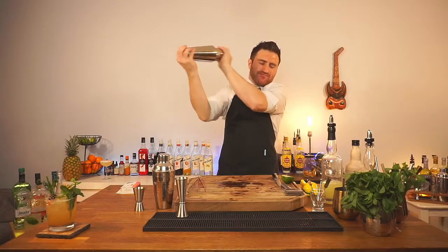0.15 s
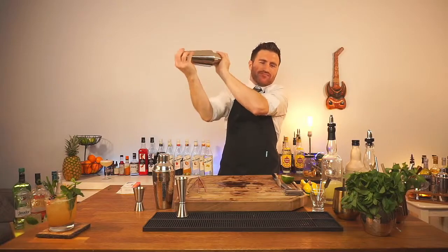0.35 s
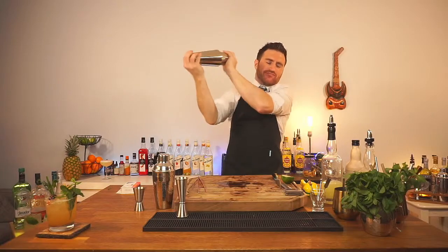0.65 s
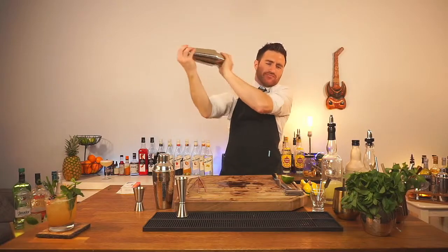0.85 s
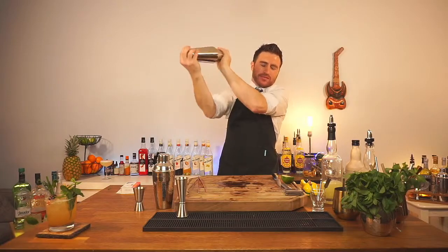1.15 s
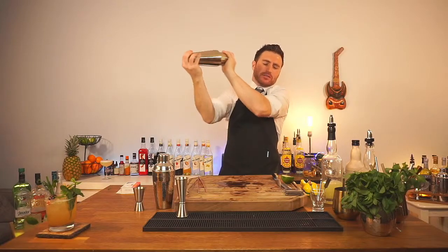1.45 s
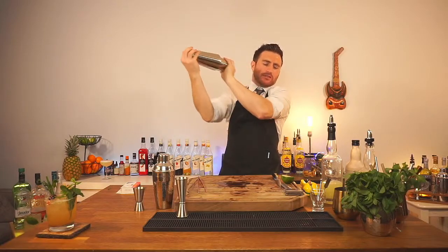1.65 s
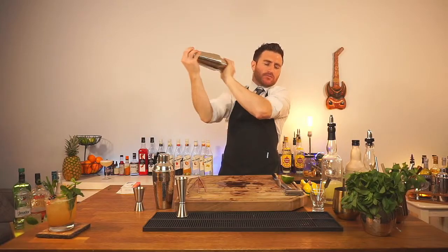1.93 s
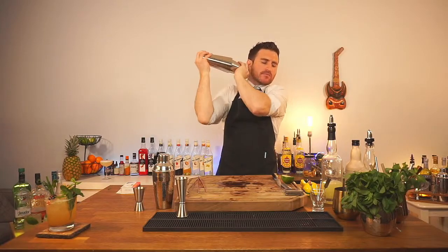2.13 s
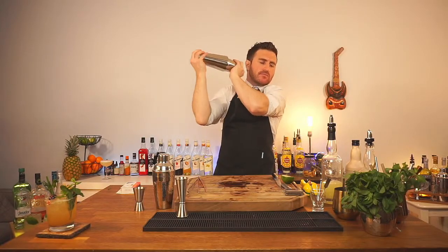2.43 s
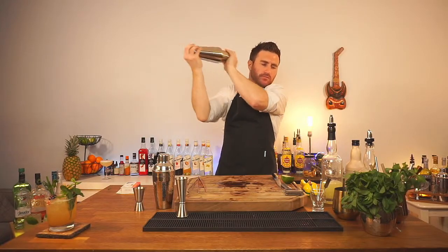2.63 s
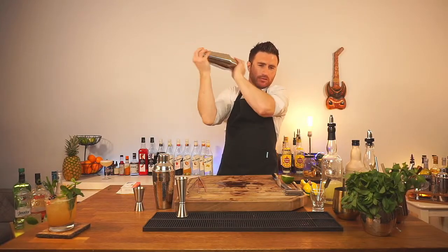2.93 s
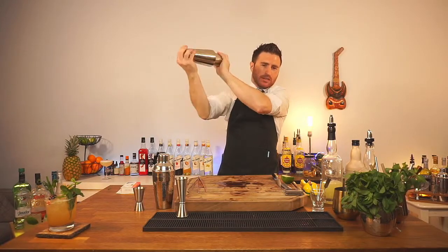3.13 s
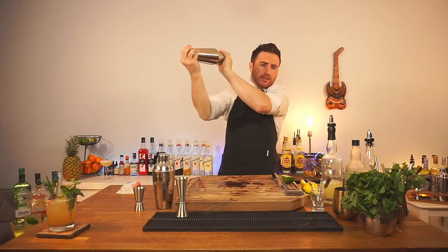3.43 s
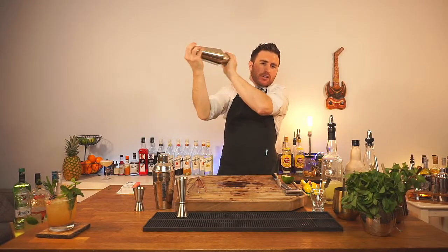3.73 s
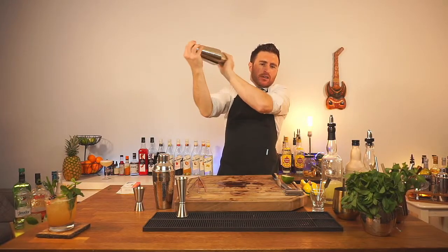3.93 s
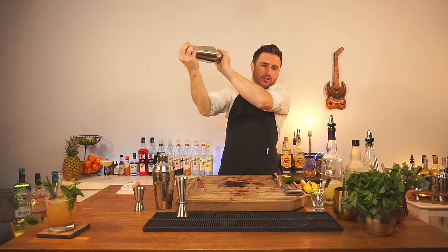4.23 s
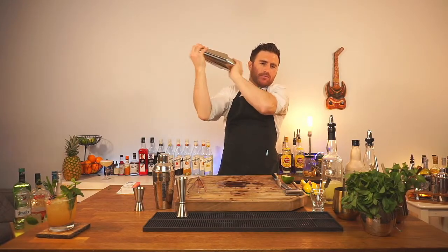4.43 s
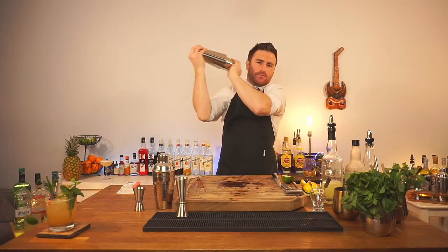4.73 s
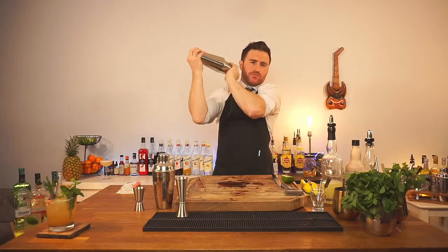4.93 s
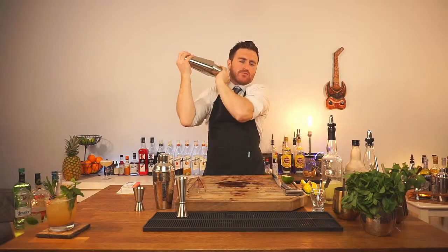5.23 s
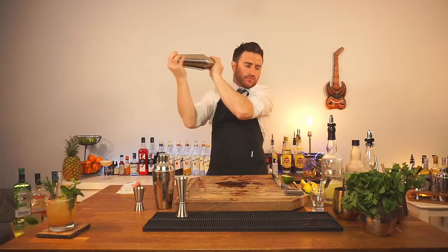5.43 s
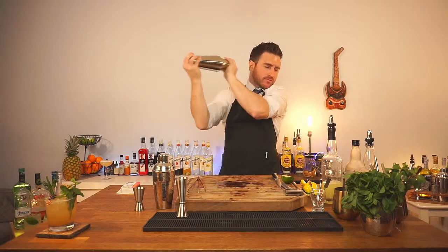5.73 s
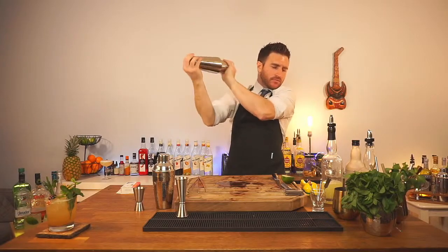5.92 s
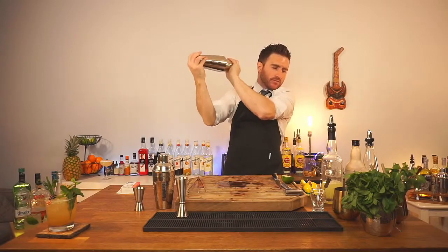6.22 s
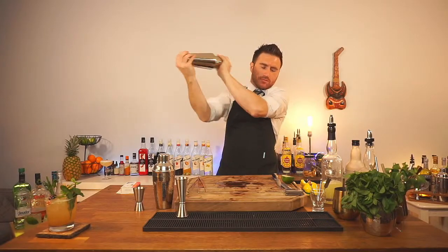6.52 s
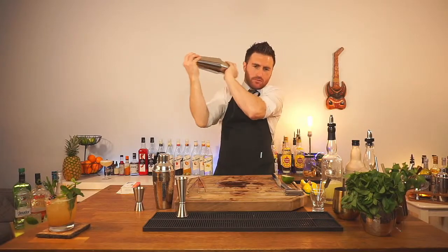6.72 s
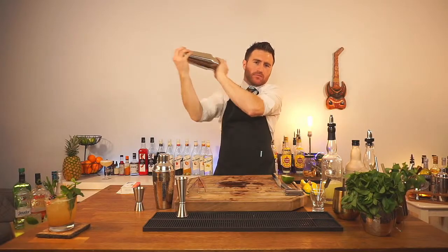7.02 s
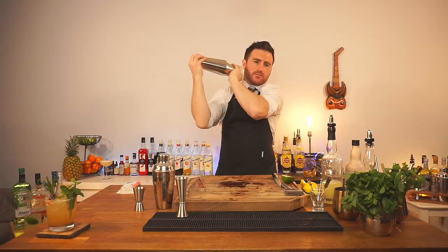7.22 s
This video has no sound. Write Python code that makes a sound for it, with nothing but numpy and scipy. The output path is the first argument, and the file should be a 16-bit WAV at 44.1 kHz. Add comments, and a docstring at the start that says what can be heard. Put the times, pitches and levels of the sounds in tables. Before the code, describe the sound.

From the very start, ice and liquid are shaken hard in a metal tin, close to a body-worn microphone in a small room. Roughly every 0.27 seconds a burst of hard, bright, quickly damped clacks strikes the steel base; about 0.15 seconds later the ice returns to the cap with a dull knock and softer patter. Liquid fizzes and swishes with both. The first second is full and vigorous; from about 1.3 to 2.8 seconds the returns grow weaker and the rhythm slightly looser, then strong strokes resume near 3.0. Around 4.5 to 4.6 seconds a low, blustery thump with sharp pops buffets the microphone, with a smaller flutter near 5.4. Shaking continues evenly, with an especially hard ringing clack at 7.0, and still runs as the sound ends around 7.4 seconds. Low rumble is faint, reverberation short.

```python
"""Hard, ringing clacks of ice on steel: cubes and a drink are shaken in a tin beside a clip-on microphone.
Each stroke throws the ice at the base, and the return makes a softer rattle at the cap; both are showers of
blows on short, damped resonances. The drink is coloured noise that fizzes with every stroke in a small room.
Jolts of the body sway the microphone, gusts and pops of air buffet it, and the loudest peaks saturate."""
import sys
import numpy as np
from scipy import signal
from scipy.fft import rfft, irfft, next_fast_len
from scipy.io import wavfile
from scipy.ndimage import uniform_filter1d, map_coordinates

SR = 44100
rng = np.random.default_rng(int(sys.argv[2]) if len(sys.argv) > 2 else 0)


def store_pcm(level_fs):
    """Save levels as 16-bit WAV."""
    pcm = np.round(np.clip(level_fs, -1, 1) * 32767).astype(np.int16)
    wavfile.write(sys.argv[1], SR, np.atleast_2d(pcm).T)


N = 325011

# Hand-damped modes of the tin's two ends, thud first: middle pitch_hz, relative level_db,
# decay_s (60 dB fall of each of the two cascaded resonators that make a mode)
BASE_MODES = [(1087, -2, 0.0029), (1544, -3.5, 0.0032), (2298, 2, 0.0033), (2803, 1.5, 0.0053),
              (4090, -12.5, 0.0054), (5150, 1, 0.0016), (5924, -1, 0.0032), (7360, -3, 0.0012),
              (8930, -6, 0.0024), (11400, -6, 0.0011)]
CAP_MODES = [(920, 14.6, 0.0014), (1510, 12.4, 0.0013), (2638, 2.9, 0.014), (3870, 9.6, 0.0031),
             (4850, 13, 0.003), (6280, 15, 0.0013), (9600, 11, 0.0011)]


def amp(db):
    """Decibels to linear gain."""
    return 10 ** (np.asarray(db) / 20)


def unit(x):
    """Scale to rms 1."""
    return x / np.sqrt(np.mean(x ** 2) + 1e-20)


def filtered(x, response):
    """Multiply the spectrum of x by a response given as a function of frequency in Hz."""
    size = next_fast_len(N + SR // 2)
    spectrum = rfft(x, size) * response(np.fft.rfftfreq(size, 1 / SR))
    return irfft(spectrum, size)[..., :N]


def noise(spectrum):
    """Noise of rms 1, coloured by points of (Hz, relative dB) joined on a log-frequency scale."""
    point_hz, point_db = np.transpose(spectrum)

    def colour(hz):
        return amp(np.interp(np.log(hz + 1), np.log(point_hz + 1), point_db))

    return unit(filtered(rng.standard_normal(N), colour))


def wobble(rate_hz):
    """A smooth random curve with rate_hz knots a second."""
    knots = rng.standard_normal(int(N * rate_hz / SR) + 4)
    return map_coordinates(knots, [np.arange(N) * rate_hz / SR])


def strokes():
    """The shaking motion: rows of (start_s, level_db, press_s) for the base and for the cap."""
    # Each shake, out and back: base_start_s, base_level_db, base_press_s, cap_start_s, cap_level_db
    # (levels are relative: each layer adds its own gain)
    shakes = [(0.002, -28.5, 0.074, 0.15, -32), (0.265, -29, 0.058, .411, -32.5),
              (0.514, -30.5, 0.062, 0.66, -32), (0.765, -30, 0.072, .93, -33.5),
              (1.019, -33, 0.063, 1.171, -35.5), (1.312, -34, 0.06, 1.466, -43.5),
              (1.62, -40, 0.054, 1.76, -52.5), (1.856, -35, 0.084, 2.035, -39),
              (2.179, -33.5, 0.054, 2.32, -38), (2.457, -36, 0.074, 2.607, -45),
              (2.764, -33.5, 0.043, 2.875, -39.5), (3.032, -28, .036, 3.181, -39),
              (3.314, -35.5, 0.067, 3.461, -36.5), (3.593, -32.5, 0.065, 3.722, -33.5),
              (3.872, -28.5, 0.036, 4.001, -39), (4.139, -29.5, 0.034, 4.282, -34),
              (4.402, -31, 0.073, 4.558, -32.5), (4.709, -30.5, 0.065, 4.884, -37.5),
              (5.008, -30, 0.042, 5.151, -33.5), (5.285, -34, 0.067, 5.43, -35),
              (5.544, -34.5, 0.1, 5.725, -33.5), (5.831, -36.5, 0.1, 6.012, -37),
              (6.121, -35, 0.097, 6.304, -35), (6.407, -35, 0.085, 6.565, -31.5),
              (6.698, -31.5, 0.081, 6.841, -32.5), (6.957, -31, 0.086, 7.116, -33),
              (7.222, -27.5, 0.074, 7.36, -48)]
    base_s, base_db, base_press_s, cap_s, cap_db = np.transpose(shakes)
    cap_press_s = np.full(len(cap_s), 0.055)
    return np.transpose([base_s, base_db, base_press_s]), np.transpose([cap_s, cap_db, cap_press_s])


def envelope(rows, rise_db, fall_db):
    """The load gathers at rise_db a second, presses for the stroke's length, then slides off at fall_db a second."""
    t, out = np.arange(N) / SR, np.zeros(N)
    for start_s, level_db, press_s in rows:
        span = slice(max(round((start_s - .1) * SR), 0), round((start_s + .5) * SR))
        since = t[span] - start_s
        fall = fall_db * np.maximum(since - press_s, 0)
        rise = rise_db * np.minimum(since, 0)
        out[span] += amp(level_db - fall + rise)
    return out


def strike(start_s, level_db, thud_db, modes, scatter_db):
    """Each blow lands elsewhere on the wet tin: every mode answers at a new strength, sign and one of three pitches."""
    shape = (len(start_s), len(modes))
    size_db = rng.normal(0, scatter_db, shape)
    pitch = rng.integers(3, size=shape)
    sign = rng.choice([-1, 1], shape)
    size_db[:, 0] += thud_db
    size_db[:, 1] += np.minimum(thud_db, 0) / 2  # a glancing blow also leaves the next mode quiet
    # a square blow loads the wall and rings lower
    pitch = np.clip(pitch - np.round(np.reshape(thud_db, (-1, 1)) / 20), 0, 2)
    gain = sign * amp(size_db + np.transpose(modes)[1])
    gain *= (amp(level_db) / np.linalg.norm(gain, axis=1))[:, None]
    at, out = np.round(start_s * SR).astype(int), np.zeros(N)
    for k, (pitch_hz, _, decay_s) in enumerate(modes):
        for step in range(3):
            near_hz = pitch_hz * (.93 + .07 * step)
            pole = amp(-60 / (decay_s * SR)) * np.exp(2j * np.pi * near_hz / SR)
            blows = np.bincount(at, gain[:, k] * (pitch[:, k] == step), N)
            # wet contact: the double pole makes the ring swell, then die
            swell = signal.lfilter([np.e * (1 - abs(pole))], [1, -2 * pole, pole ** 2], blows)
            out += swell.imag
    return out


def rattle(rows, modes, count, rise_db, fall_db, spread_db, thud_db):
    """A shower of contacts under each stroke: few large, many small; the thud follows the age of the stroke."""
    start_s, luck = rng.random((count, 2)).T
    start_s = start_s * (N - 1) / SR
    load = envelope(rows, rise_db, fall_db)[(start_s * SR).astype(int)]
    level_db = 20 * np.log10(load + 1e-9) - spread_db * np.log(1 - luck * .92)
    # contacts up to 30 ms early belong to the coming stroke
    stroke = np.maximum(np.searchsorted(rows[:, 0], start_s + .03) - 1, 0)
    age_s = start_s - rows[stroke, 0]
    return strike(start_s, level_db, thud_db(age_s), modes, scatter_db=7)


def hard_clacks():
    """The hardest cubes strike one by one, each with its own balance of thud against ring, all rung on the
    modes of the base; the one near 2.03 s is a cube knocking back at the cap."""
    # Single blows: start_s, level_db (all modes together), thud_db (shift of the first mode)
    clack_table = [(0.0123, -3, 5.5), (0.0436, -4.5, 12), (0.2682, -18, -20), (0.2813, -12, -4),
                   (0.2878, -6.5, -1), (.2994, -12, 4), (0.306, -6.5, 10), (0.5039, -10.5, -29.5),
                   (0.514, -8, -25), (.5407, -10, -3), (.76, -10, -3), (0.7636, -7, 9), (0.7765, -10, -17),
                   (1.012, -11, -37), (1.033, -12, -6), (1.041, -9, -25), (1.073, -10, 7),
                   (1.0815, -4.5, 5), (1.346, -4.5, 12.5), (1.3558, -12.5, 16), (1.62, -7.5, 3),
                   (1.626, -12, 4), (1.6489, -12, -15), (1.8613, -11.5, -27), (1.8847, -4, 6.5),
                   (1.924, -14, -15), (2.033, -16.5, 18), (2.18, -9, 8.5), (2.1911, -13, 13),
                   (2.2102, -11, 19), (2.4644, -2, 6.5), (2.508, -8, 9.5), (2.7607, -5, -1.5),
                   (3.0362, -10.5, 0), (3.06, -10, -8), (3.067, -4.5, 12.5), (3.0697, -11.5, 6),
                   (3.0787, -16, -6), (3.3355, -9.5, 10), (3.3482, -10, -2), (3.5988, -7.5, 1),
                   (3.6163, -9, -8), (3.6247, -7, -8), (3.8838, -8.5, 11), (4.137, -9.5, -12),
                   (4.142, -8, 8), (4.405, -12, -9), (4.4193, -10, -14), (4.4429, -4, -2), (4.4557, -6, -1),
                   (4.4648, -9, -2), (4.7357, -10, -29), (4.7441, -2, -2), (4.759, -8, -10),
                   (5.0095, -11.5, -35), (5.2935, -10.5, 1), (5.31, -14, -4), (5.3185, -11, 8),
                   (5.3293, -13, 0), (5.55, -9.5, -8), (5.5676, -11.5, 1), (5.5906, -5.5, -8),
                   (5.6107, -7.5, 13), (5.6218, -10, 3), (5.818, -14.5, -8), (5.834, -12, 1),
                   (5.863, -5, 17), (6.1217, -8.5, -25), (6.1278, -7, -1), (6.1354, -9, 9),
                   (6.1575, -6, -8), (6.188, -10.5, -14), (6.419, -11, -31), (6.437, -5.5, 9.5),
                   (6.446, -6.5, 1), (6.479, -7, 14), (6.4903, -13.5, 3), (6.7003, -5.5, -23),
                   (6.7163, -5.5, 12.5), (6.7371, -7.5, 13), (6.9639, -2, -29.5), (6.996, 2, -24),
                   (7.006, -7.5, 10), (7.2188, -12, -4), (7.2277, -7, -17), (7.2367, -8.5, -23),
                   (7.2767, -9.5, 10), (7.282, -8, -14), (7.2982, -9, 14)]
    return strike(*np.transpose(clack_table), BASE_MODES, scatter_db=3)


def base_rattle(rows):
    """Small contacts on the base start bright and dull as the load piles up."""
    first_thud_db, thud_db_per_s, last_thud_db = -16, 396, 5

    def piling(age_s):
        return np.minimum(first_thud_db + thud_db_per_s * age_s, last_thud_db)

    return rattle(rows, BASE_MODES, count=1900, rise_db=2200, fall_db=423, spread_db=7.0, thud_db=piling)


def cap_rattle(rows):
    """The returning ice patters softly on the cap, with an even balance of thud and ring."""
    return rattle(rows, CAP_MODES, count=2000, rise_db=1500, fall_db=288, spread_db=4.5, thud_db=np.zeros_like)


def cap_knocks(rows):
    """One cube leads each return with a dull knock that favours the first mode of the cap."""
    return strike(rows[:, 0], rows[:, 1] + 13.5, 25, CAP_MODES, scatter_db=4)


def cap_ticks():
    """Lone bright ticks ring only three of the cap's upper modes."""
    # Single ticks: start_s, level_db (all modes together)
    tick_table = [(0.4557, -13), (5.5239, -15.5), (6.0366, -12.5), (6.3282, -13), (7.1659, -19)]
    return strike(*np.transpose(tick_table), -4, CAP_MODES[3:6], scatter_db=3)


def ice():
    """Clacks, rattles, knocks and ticks sound through a small tin, which radiates little bass."""
    to_base, to_cap = strokes()
    rattles = amp(4.0) * base_rattle(to_base) + amp(4.0) * cap_rattle(to_cap)
    tin = hard_clacks() + cap_ticks() + rattles + cap_knocks(to_cap)
    return filtered(tin, lambda hz: (1j * hz / (300 + 1j * hz)) ** 3)


def drink():
    """The liquid fizzes along the wall in shifting patches with every stroke, strongest around its hollow note."""
    # Basic colour of the fizz: pitch_hz, relative level_db (per Hz)
    slosh = [(300, -22.5), (450, -7), (1000, -16), (3300, -11.5), (4200, -13), (6000, -11), (10000, -19),
             (16000, -30)]
    # Hollow note as the drink washes past the ice: time_s, pitch_hz
    wash = [(0, 3770), (5.3, 4440)]
    hz, t, spectra = signal.stft(noise(slosh), SR, nperseg=128)
    patches = uniform_filter1d(rng.standard_normal(spectra.shape), size=2, axis=0)
    patches = uniform_filter1d(patches, size=15, axis=1)
    hollow_hz = np.interp(t, *np.transpose(wash))
    hollow = np.exp(-((hz[:, None] - hollow_hz) / 450) ** 2)
    shaped = spectra * amp(4.5 * unit(patches) + 8 * hollow)
    fizz = unit(signal.istft(shaped, nperseg=128)[1][:N])
    surge = envelope(np.vstack(strokes()), rise_db=1403, fall_db=239)
    return (amp(-3.5) * surge + amp(-66)) * fizz  # a very faint fizz never stops


def room(x):
    """A short, dull answer from the walls: decaying noise that starts after 3 ms, softened above 3500 Hz."""
    t, decay_s = np.arange(SR // 4) / SR, .15
    tail = rng.standard_normal(len(t)) * amp(-60 * t / decay_s) * (t > .003)
    wet = signal.fftconvolve(x, tail / np.linalg.norm(tail))[:N]
    return filtered(wet, lambda hz: 1 / (1 + 1j * hz / 3500))


def sway():
    """Each reversal jolts the chest: a push mostly below hearing, with a rebound after the strokes to the base."""
    lead_s = .06  # room for the start of each push ahead of its stroke
    t, jolts = np.arange(SR // 5) / SR - lead_s, np.zeros((2, N + SR))
    for end, rows in enumerate(strokes()):
        jolts[end, (rows[:, 0] * SR).astype(int)] = amp(rng.normal(-27.5, 3.0, len(rows)))

    def bump(centre_s, width_s):
        return np.exp(-((t - centre_s) / width_s) ** 2)

    base_push = 0.5 * bump(0.012, 0.017) - 0.66 * bump(0.065, 0.019)
    cap_push = 1.15 * bump(0.02, 0.022)
    pushes = signal.fftconvolve(jolts, [base_push, cap_push], axes=1).sum(0)
    return pushes[round(lead_s * SR):][:N]


def buffet():
    """Lumpy turbulence and a few sharp pops on the capsule over a faint, uneven low rumble."""
    # Gusts of air on the capsule: peak_s, level_db
    gust_table = [(2.36, -36), (4.42, -25), (4.5, -25), (4.551, -14), (4.89, -30), (5.379, -27.5),
                  (5.44, -29)]
    # Colour of the turbulence: pitch_hz, relative level_db (per Hz)
    gust_colour = [(12, -0.5), (30, 4), (90, -3), (250, -13.5), (600, -28), (1500, -46), (4000, -90)]
    # Sudden flips of pressure: flip_s, signed size (linear)
    pop_table = [(4.506, .12), (4.5646, 0.34), (4.608, -0.15), (5.435, 0.054)]
    t = np.arange(N) / SR
    rise_db_per_s, fall_db_per_s = 448, 114
    gusts = np.zeros(N)
    for peak_s, level_db in gust_table:
        slope_db = np.minimum(rise_db_per_s * (t - peak_s), fall_db_per_s * (peak_s - t))
        gusts += amp(level_db + slope_db)
    lumps = unit(amp(5 * wobble(45)) * noise(gust_colour))
    rumble = amp(-48.0 + 4 * wobble(8)) * noise([(15, -11.5), (70, -25.0), (160, -41.5), (700, -81)])
    pops = np.zeros(N)
    for flip_s, size in pop_table:
        fade_s = np.where(t < flip_s, .008, .03)  # a quick build-up, a slower release
        pops += size * np.tanh((t - flip_s) / 0.00034) * np.exp(-abs(t - flip_s) / fade_s)
    return gusts * lumps + rumble + pops


def scene():
    """The tin and its room, with the sway and buffeting of the microphone."""
    tin = ice() + drink()
    return (tin + amp(-11.0) * room(tin) + sway() + buffet())[None]


def record(dry):
    """The input stage saturates, and neither steady pressure nor anything above the band limit is kept."""
    ceiling, top_hz = .35, 15900
    squashed = dry / (1 + np.abs(dry / ceiling) ** 6) ** (1 / 6)
    return filtered(squashed, lambda hz: (hz > 1) & (hz < top_hz))


dry = scene()
out = record(dry)
store_pcm(out)
```